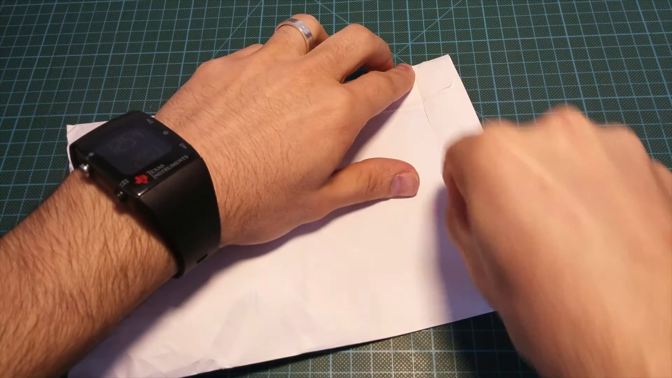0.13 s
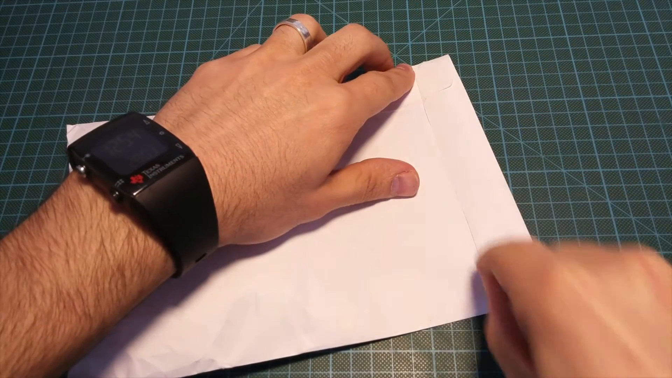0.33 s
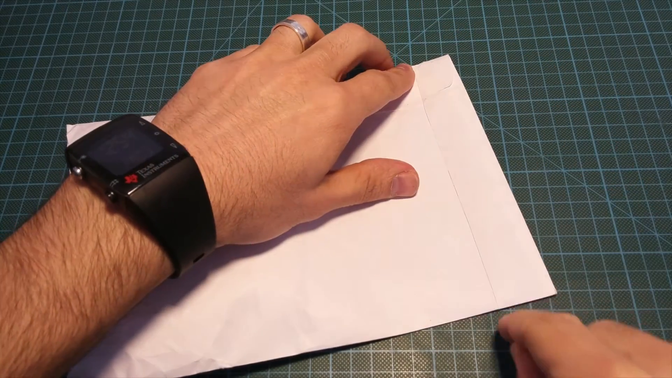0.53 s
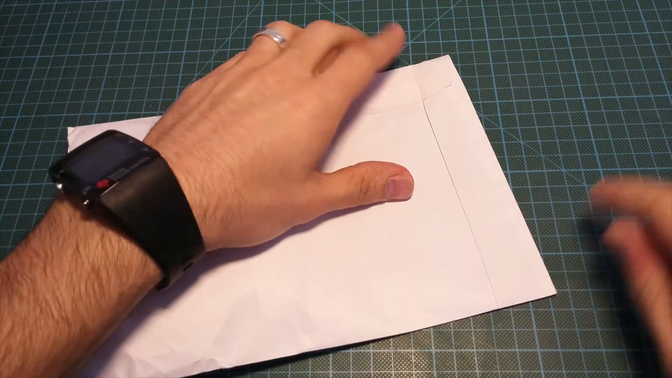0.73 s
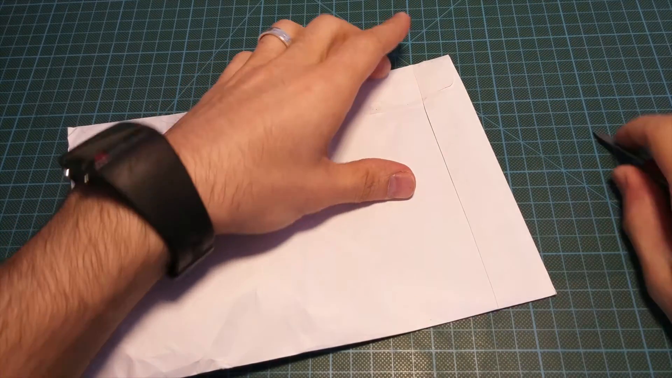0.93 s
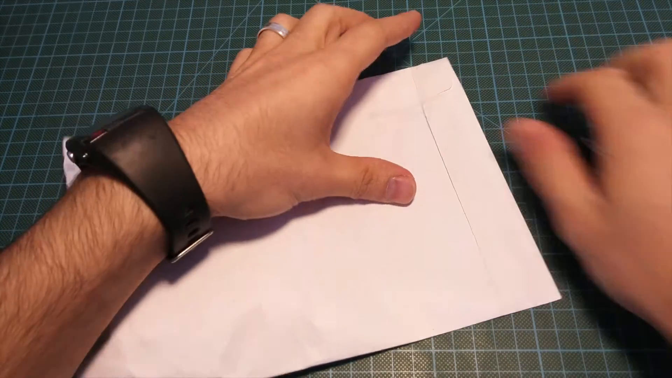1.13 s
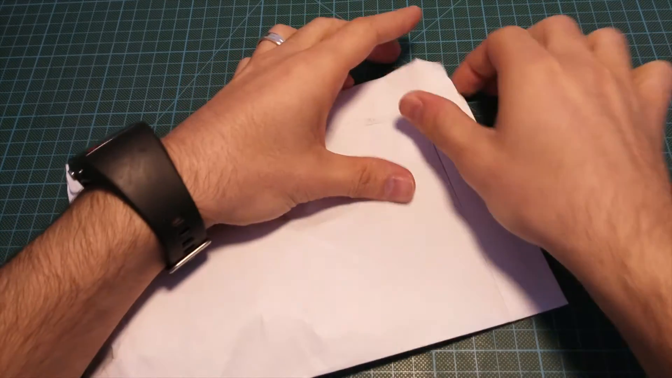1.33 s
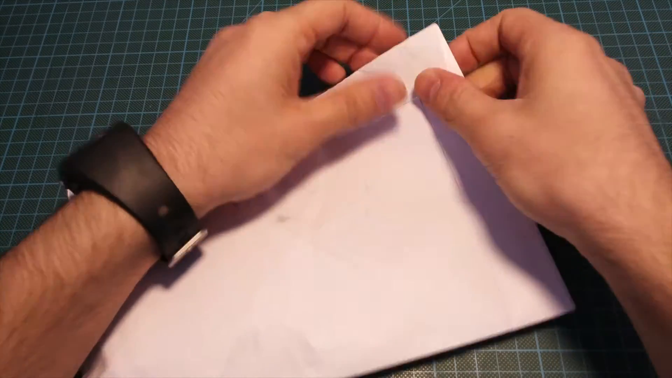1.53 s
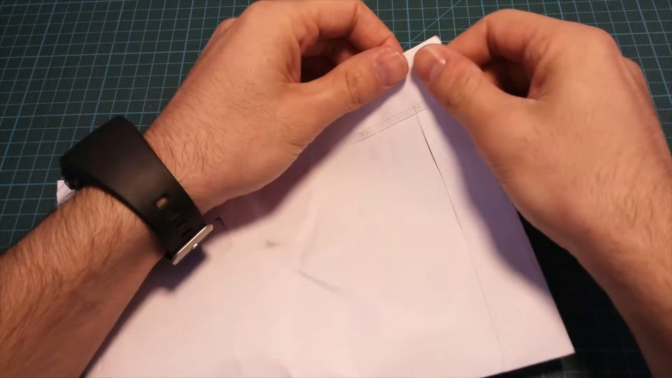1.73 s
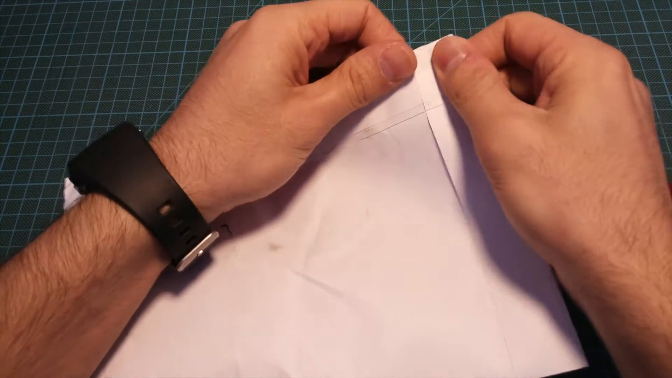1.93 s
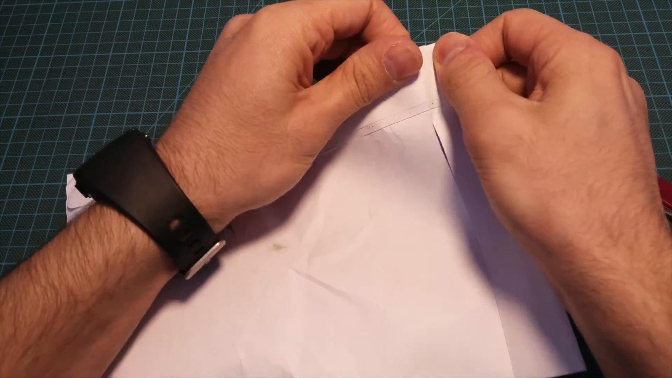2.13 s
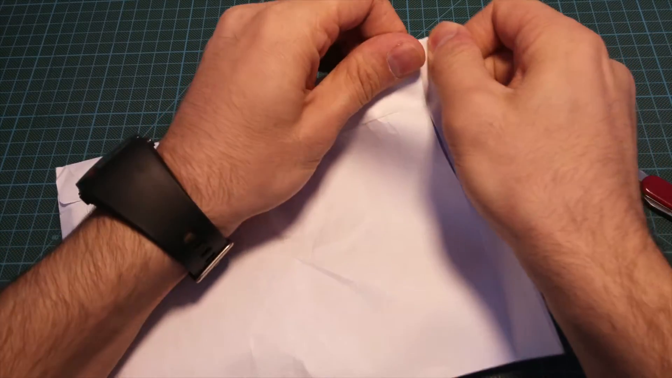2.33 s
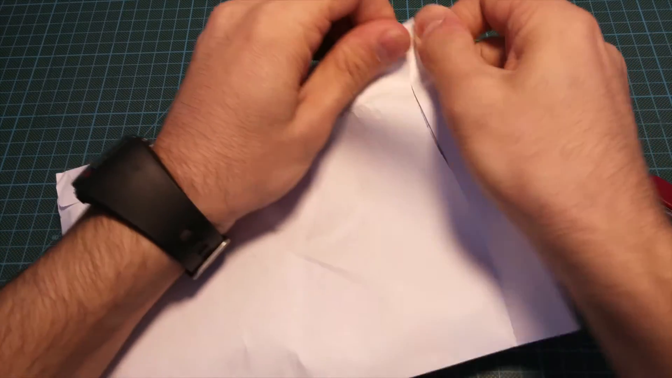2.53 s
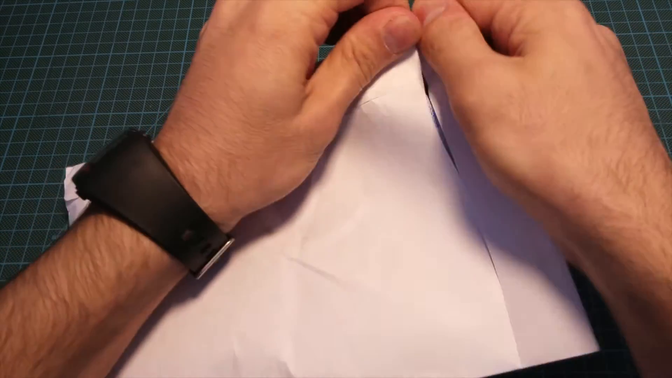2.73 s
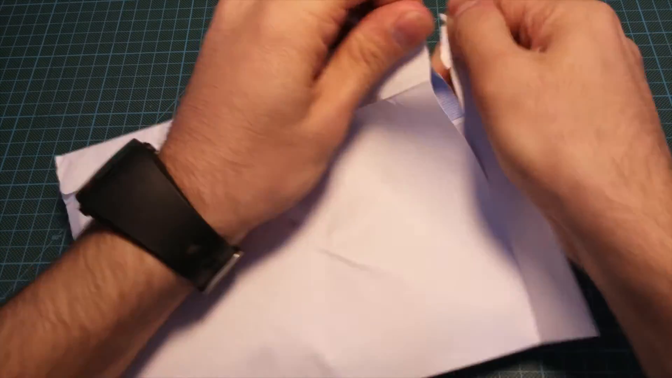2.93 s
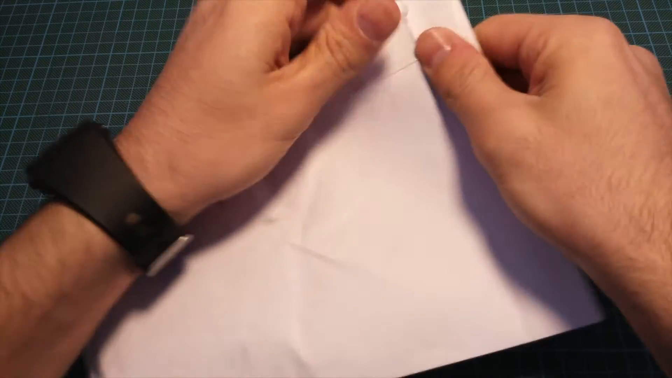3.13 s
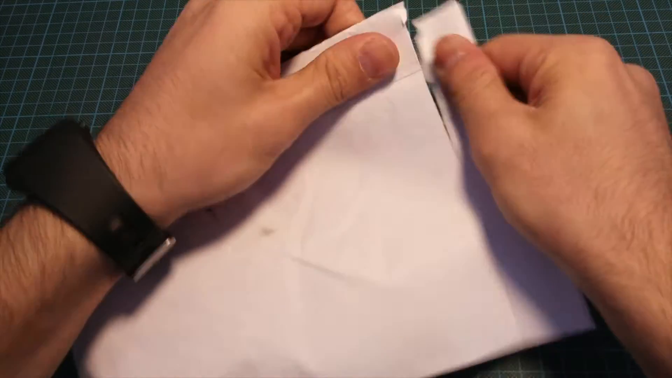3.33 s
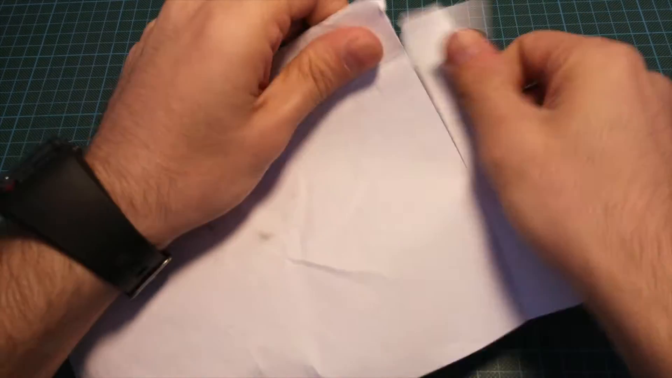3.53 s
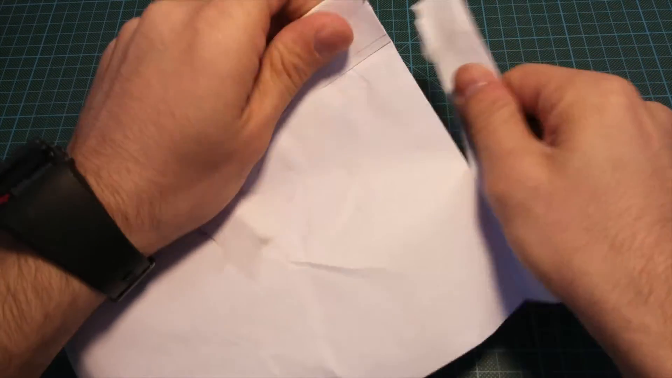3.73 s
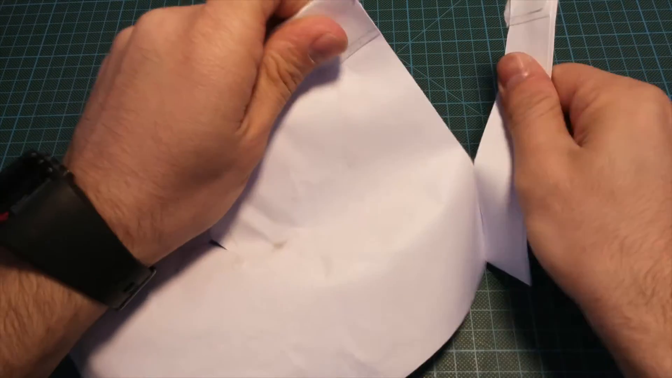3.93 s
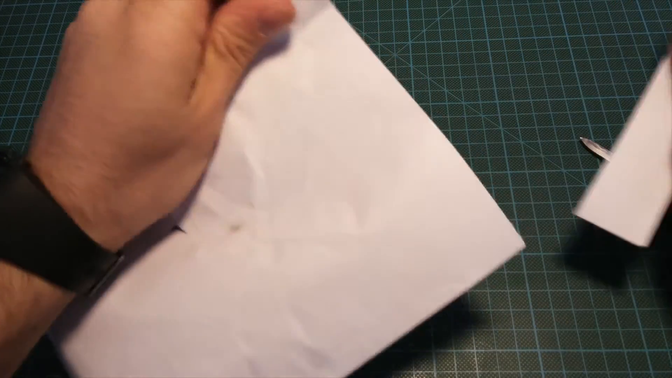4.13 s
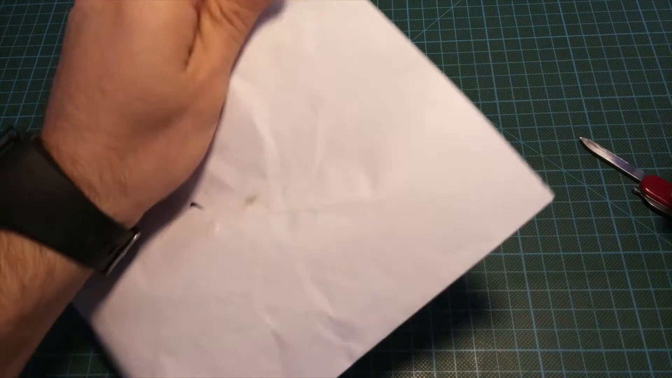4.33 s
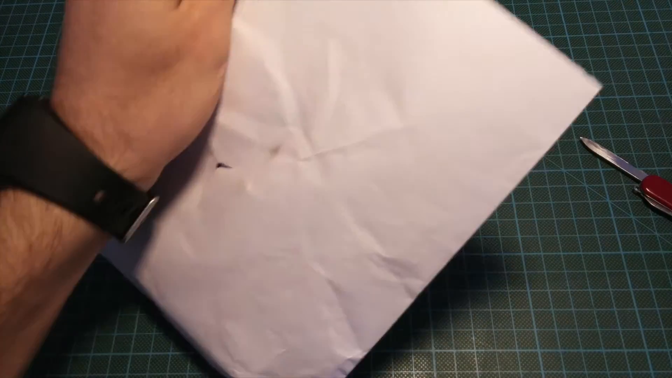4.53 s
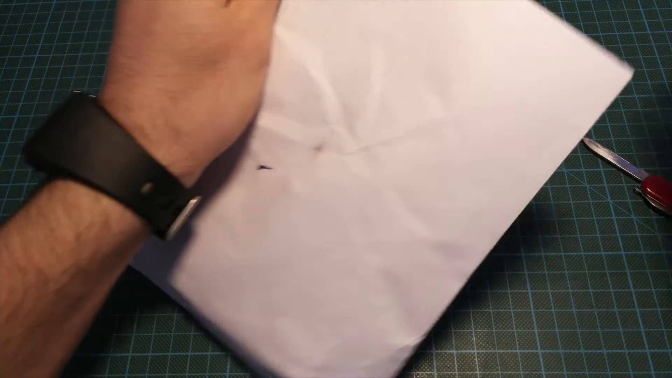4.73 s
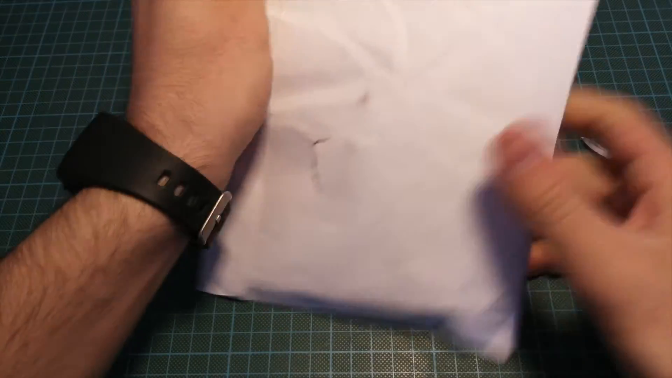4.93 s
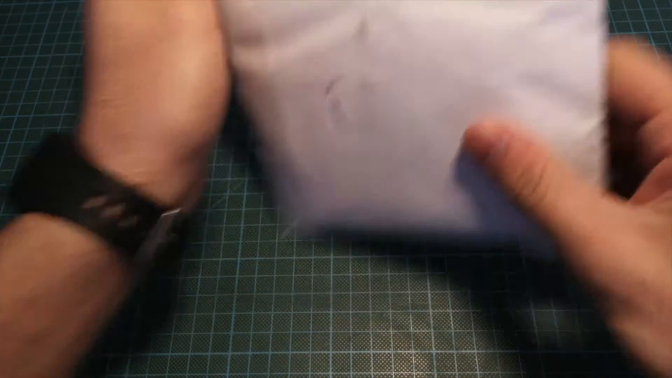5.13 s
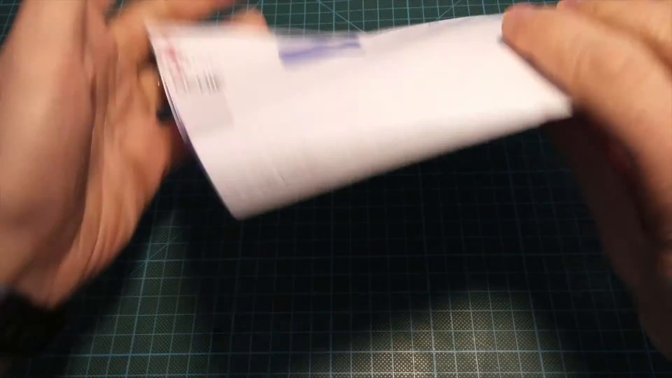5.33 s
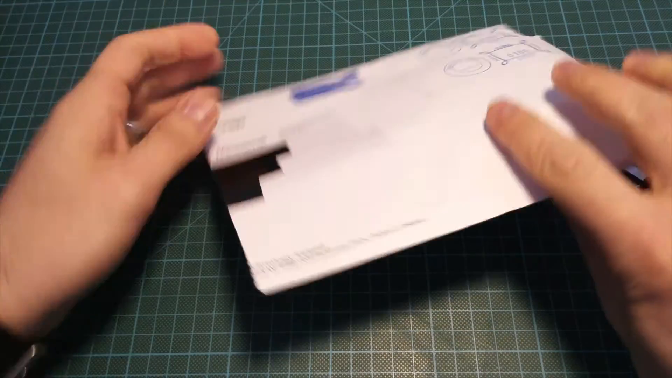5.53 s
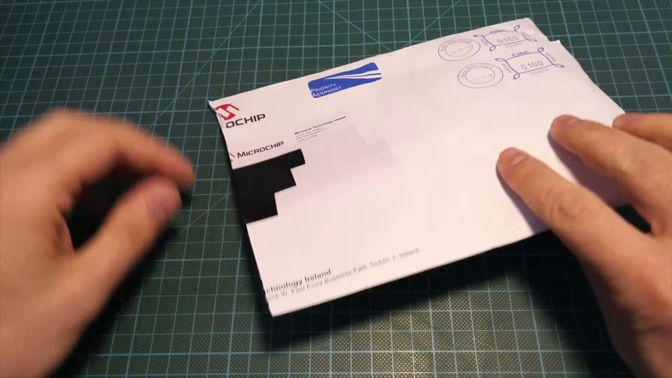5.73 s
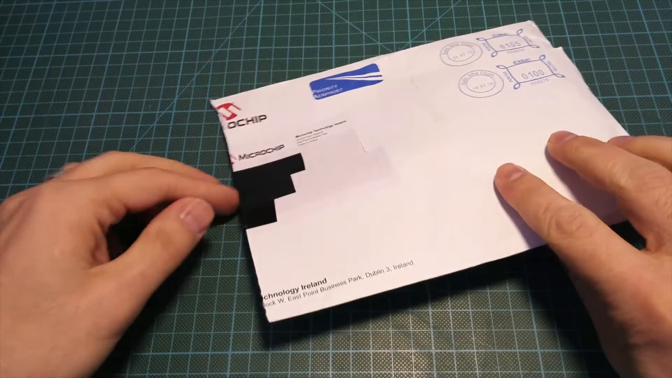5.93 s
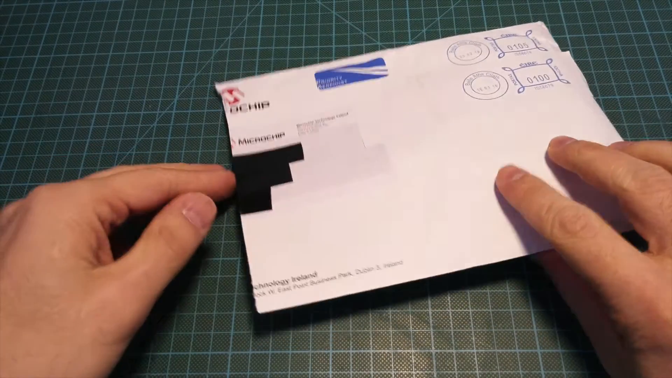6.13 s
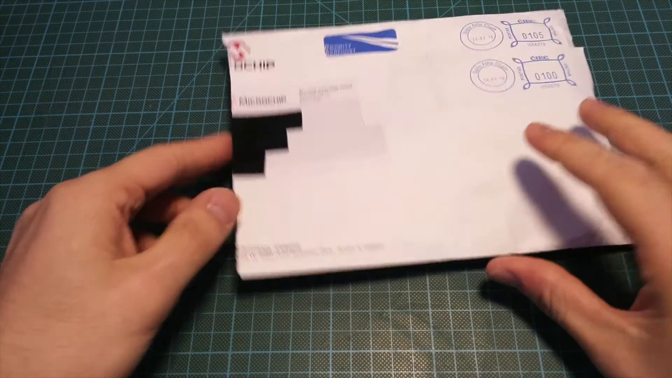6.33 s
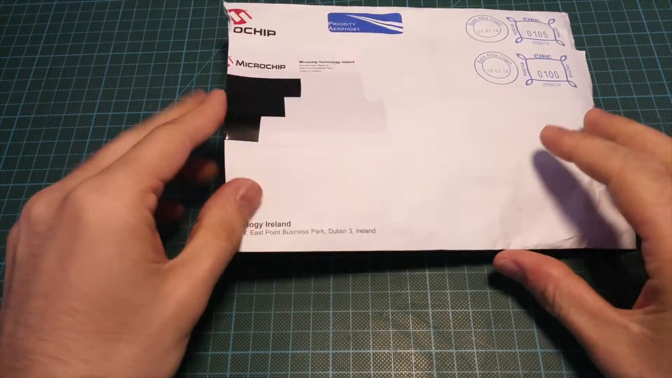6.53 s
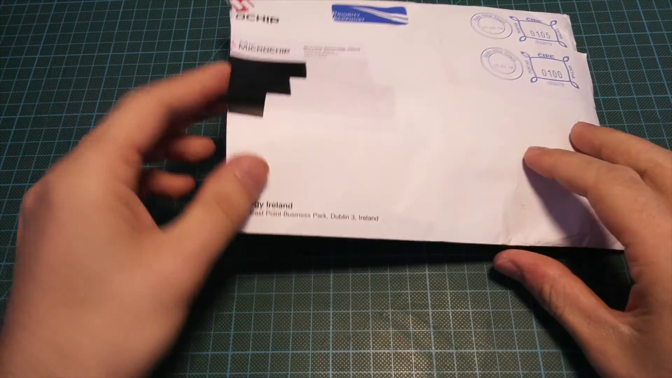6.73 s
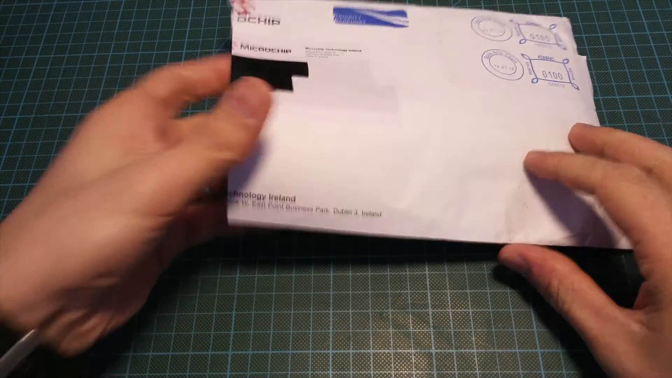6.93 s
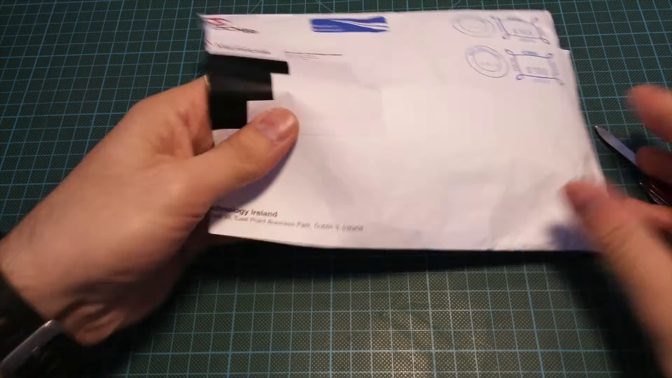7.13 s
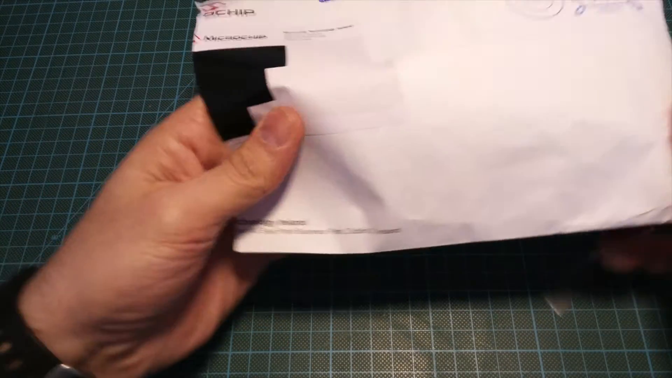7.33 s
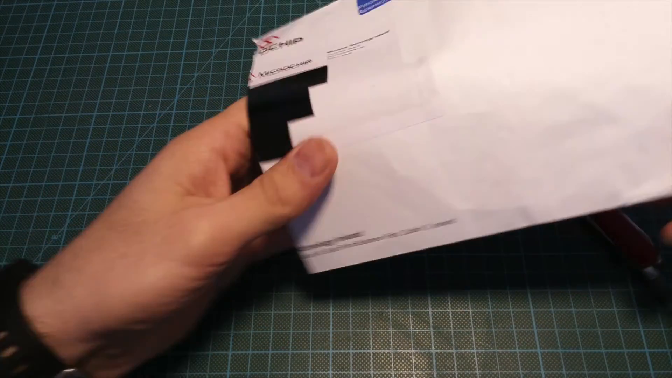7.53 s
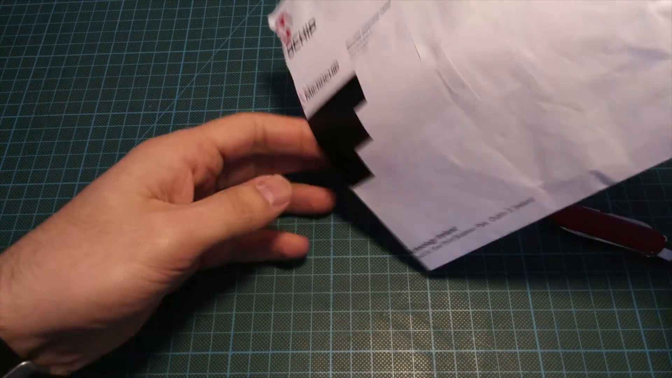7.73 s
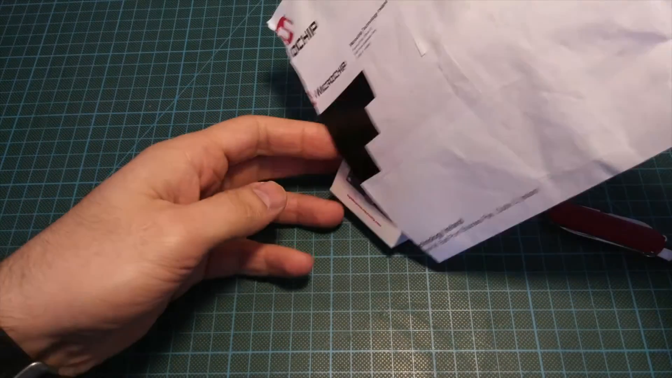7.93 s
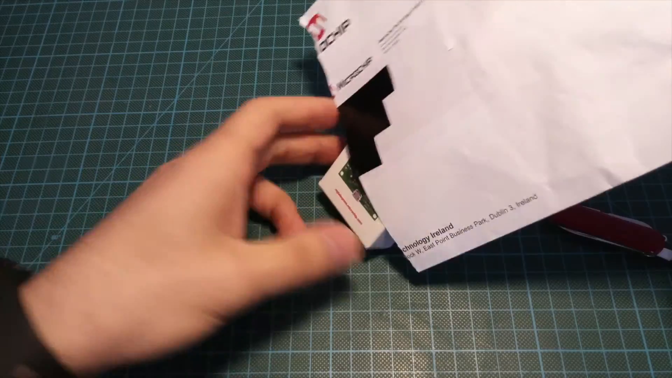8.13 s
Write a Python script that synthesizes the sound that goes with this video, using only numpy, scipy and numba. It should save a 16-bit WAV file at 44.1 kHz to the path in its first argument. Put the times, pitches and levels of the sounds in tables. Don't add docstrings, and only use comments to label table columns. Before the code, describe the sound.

Close, dry paper handling: a brief slide, picking snaps, sharp tears, soft swishes, then loud crinkling and low desk knocks in a small room.

```python
import sys
import numpy as np
from scipy import signal
from scipy.fft import rfft, irfft
from scipy.io import wavfile
from scipy.ndimage import uniform_filter1d, map_coordinates
from numba import njit

SR = 44100
rng = np.random.default_rng(int(sys.argv[2]) if len(sys.argv) > 2 else 0)


def linear_from_db(decibels):
    return 10 ** (np.asarray(decibels, float) / 20)


def master(y):
    cut = np.clip(np.atleast_2d(y).T, -1, 1)
    pcm = np.round(cut * 32767)
    wavfile.write(sys.argv[1], SR, pcm.astype(np.int16))


N = 361619

# pitch_hz, level_db (per Hz)
AIR = [(24, -33), (40, 42), (54, 2), (237, 13.5), (455, 0.5), (1720, 3), (6020, -24), (11000, -28),
       (16000, -24)]
AIR_DB = -62
# pitch_hz, gain_db
MIC = [(30, -21), (70, -17.5), (120, -6.5), (200, -5), (1000, 0.64), (3000, 0.96), (7000, 2), (12000, -2.5),
       (15800, 2), (16300, -25)]
# pitch_hz, left_minus_right_db
PORTS = [(250, -1.9), (1000, -1.1), (2500, 1.9), (8000, 2.9), (13000, -1.4)]
PORT_LAG_S = 0.000096
# pitch_hz, gain_db
WALLS = [(60, -3.5), (300, 3.5), (1200, -0.3), (4000, 3.5), (16000, -4.5)]
ROOM_T60_S, ROOM_DB = 0.34, -10.5
DESK_HZ, DESK_T60_S, DESK_DB = 127.9, 0.89, -64.5

# start_s, stop_s, level_db, stretch_ratio (of the resonances), glide_share
SWISHES = [
    (-.05, 0.453, -47.5, 1.23, 0),
    (4.283, 4.89, -62, 0.77, 0),
    (4.81, 5.175, -51, 0.9, .1),
    (5.18, 5.377, -49, .8, -.15),
    (5.585, 5.8, -45, 0.85, -.12),
    (6.05, 6.094, -55, 0.82, 0),
    (6.298, 6.41, -54, 0.96, .1),
    (6.4, 6.52, -54, 0.96, -.1),
]
# pitch_hz, width_hz, level_db
GAP = [(850, 350, 0), (1200, 200, 3), (1650, 170, 1), (2350, 200, -2), (3000, 800, -2), (5000, 700, -12),
       (3000, 7000, -11), (12500, 9000, -25)]
# start_s, stop_s, level_db, pitch_hz, half_width_hz
WHISPERS = [(4.26, 4.7, -65, 2330, 70), (4.4, 4.66, -66, 2950, 60), (4.68, 4.84, -63, 2900, 60),
            (4.78, 4.93, -57, 1800, 80), (1.84, 1.93, -56, 1700, 500), (4.75, 4.93, -61, 2300, 70),
            (5.615, 5.67, -52, 5000, 500), (5.62, 5.71, -44, 3000, 550), (5.61, 5.7, -42, 1150, 300),
            (5.59, 5.72, -48, 1680, 100), (5.2, 5.26, -50, 4600, 500), (5.22, 5.34, -49, 3250, 450),
            (5.27, 5.33, -53, 5600, 700), (7.52, 7.6, -46, 1600, 250), (7.1, 7.14, -48, 3300, 500),
            (7.19, 7.26, -50, 6000, 1500), (7.66, 7.69, -48, 4600, 600), (7.77, 7.83, -50, 4300, 600)]
# start_s, peak_db
BUMPS = [
    (4.202, -27),
    (5.101, -40),
    (5.199, -35),
    (7.6, -46),
    (7.91, -26),
    (7.96, -27),
    (8.02, -35),
]
BUMP_HZ, BUMP_CYCLES = 129, 4

# time_s, flexing_db, desk_weight_db, layer_shear_db
HANDS = [(0.0, -51.5, 2, 4), (0.2, -44.5, -3.5, -0.5), (0.77, -65.5, 0, -2.5), (1.3, -49.5, -15.5, -10),
         (1.57, -44.5, -12.5, -9.5), (2.12, -58.5, -12, -10), (3.04, -49.5, -13.5, -5.5),
         (3.9, -42, -12.5, -10), (4.32, -47, -14, -11), (4.59, -64.5, -7, 2), (5.07, -45.5, -13, -5),
         (5.43, -64, 2.5, 6), (5.57, -50, -8, -13.5), (5.98, -60, -8.5, -9), (6.92, -57.5, -5, -10.5),
         (6.99, -50, -17, -5.5), (7.79, -39.5, -11, -12.5), (8.2, -50, 1.5, -12)]
STIR_DB, STIR_S = -29.5, 0.039
# start_s, stop_s, swell_db, force_db, fineness_db
RIPS = [
    (1.113, 1.136, -9.5, -34.5, -11.5),
    (2.889, 2.95, 1.5, -28, -8),
    (3.432, 3.492, 1.5, -25.5, -18),
    (3.864, 3.878, -2.5, -21.5, -25.5),
    (4.116, 4.203, -4, -22.5, -12),
]
RIP_DESK_DB, RIP_RUB_DB = -12, -5.5
# start_s, stop_s, swell_db, force_db, fineness_db
SCUFFS = [(1.74, 1.8, 3, -50.5, -3), (2.597, 2.718, 6, -42, -14), (2.423, 2.495, -3, -62, -1.5),
          (6.967, 7.039, 8, -32.5, -17.5), (7.172, 7.261, -3, -43.5, -16), (7.5, 7.55, -14, -37, -18),
          (7.838, 7.905, 3.5, -36.5, -14), (3.89, 3.95, -3, -36, -10), (.6, .66, 0, -58, -4),
          (5.41, 5.5, -3, -50, -14), (4.125, 4.2, -5, -28.5, -11), (5.18, 5.21, 8, -42, -14),
          (5.06, 5.09, 3, -44, -14), (3.1, 3.135, 3, -46, -4)]
SCUFF_RUB_DB = -8
# low_hz, high_hz, share_of_ticks (that ring here), length_cycles, size_spread_db, trim_db
SWARMS = [
    (450, 2320, 0.4, 2.54, 6, -2.5),
    (81, 423, 0.14, 1, 1, 3.5),
    (2310, 6240, 0.89, 2.9, -6.5, -0.2),
    (7900, 14600, 1, 2.8, 3.5, 4),
]
FIBRE_UNDER_RUB_DB = -9

# start_s, peak_db, pitch_hz
POPS = [(2.2344, -11, 1200), (2.2015, -24, 2600), (2.347, -22, 1200), (3.8715, -8, 1500),
        (4.1238, -6, 1500), (3.4965, -14, 1300), (5.2065, -20, 1100), (7.6225, -22, 850), (7.637, -21, 950),
        (7.5025, -26, 4400), (7.504, -28, 5400), (1.961, -28, 4800), (4.158, -11, 450), (4.136, -14, 900),
        (4.178, -15, 2500), (4.2, -15, 1800), (3.878, -16, 1500), (3.892, -19, 1800), (3.444, -17, 1300),
        (3.462, -12, 1100), (3.473, -14, 1500), (3.966, -24, 1000), (4.085, -32, 900), (7.203, -24, 950),
        (7.224, -23, 1100), (7.261, -24, 900), (7.279, -28, 1000), (7.4, -29, 800), (7.495, -30, 700),
        (7.512, -25, 700), (7.521, -28, 900), (7.552, -30, 1200), (7.673, -26, 900), (7.722, -30, 1400),
        (7.773, -31, 690), (7.105, -30, 1100), (7.12, -30, 1000), (2.122, -40, 800), (2.405, -44, 1200),
        (2.428, -40, 3600), (2.455, -46, 4600), (3.148, -36, 1300), (3.234, -36, 1500), (2.905, -20, 1200),
        (2.92, -22, 1300), (4.905, -42, 900), (5.198, -32, 1000), (5.068, -36, 1000), (.9655, -27, 2400),
        (1.124, -11, 1500), (1.157, -20, 1600), (2.956, -6, 1350), (.776, -36, 2000), (1.419, -21, 2300),
        (1.565, -15, 2600), (3.457, -14, 2200), (1.945, -38, 500), (1.455, -30, 1100), (1.668, -32, 600),
        (7.392, -32, 2400)]
# start_s, peak_db
CRACKS = [(.613, -35), (0.647, -29), (1.1105, -16), (1.201, -29), (1.209, -26.5), (1.3656, -32.5),
          (1.564, -25), (1.7486, -38), (1.769, -28.5), (2.128, -34.5), (2.263, -27), (2.283, -29),
          (2.645, -27), (2.6796, -34), (2.8435, -34.5), (2.8907, -21.5), (3.1072, -29.5), (3.4239, -18.5),
          (3.4537, -14), (3.5626, -30.5), (3.6334, -30.5), (3.8103, -27), (3.8712, -16.5), (3.885, -18),
          (3.929, -21), (3.9425, -17), (4.0976, -18), (4.123, -14), (4.1706, -15.5), (7.86, -38),
          (2.3146, -43), (2.3336, -42), (2.4274, -42), (2.473, -46), (2.4982, -42), (2.5985, -39),
          (2.8654, -37), (3.122, -34), (3.2046, -36), (3.233, -41), (3.3428, -42), (3.3742, -37),
          (3.435, -22), (3.473, -22), (3.7404, -38), (3.974, -32), (4.107, -31), (4.117, -25), (4.134, -20),
          (4.148, -20), (4.158, -20), (4.19, -22), (5.415, -42), (5.956, -50), (6.065, -56), (.754, -48),
          (6.37, -56), (6.455, -54), (1.961, -34)]
# start_s, peak_db, pitch_hz
CRINKLES = [(.649, -34.5, 3440), (1.123, -14, 1400), (1.44, -26.5, 1080), (1.677, -27, 427),
            (2.553, -40, 410), (2.597, -51, 1090), (2.845, -35.5, 700), (2.945, -11, 1400),
            (3.024, -32, 1150), (3.368, -35, 1100), (3.472, -29, 795), (3.559, -18.5, 1050),
            (4.033, -37, 880), (4.161, -18.5, 1110), (7.081, -21.5, 950), (7.185, -24.5, 970),
            (7.234, -18.5, 885), (7.271, -23, 1040), (7.314, -29, 600), (7.418, -33, 1010),
            (7.536, -30, 525), (7.572, -35, 1440), (7.591, -32.5, 1050), (7.654, -28, 1030),
            (7.829, -27, 1530), (7.953, -36, 1050), (8.1, -27, 770), (8.119, -27, 1350),
            (8.147, -35.5, 824), (8.186, -47, 403)]
# start_s, peak_db, pitch_hz,
# edge_db (against the peak)
PICKING = [(.445, -37, 840, -12), (0.613, -40, 450, 2), (0.775, -35, 2020, -10), (0.965, -34, 2000, -20),
           (1.093, -37, 1100, -48), (1.111, -10.5, 920, -43), (1.157, -20, 1500, -20),
           (1.322, -20, 1190, -12), (1.367, -29.5, 450, -3), (1.418, -19, 2030, -1),
           (1.474, -26.5, 1080, -9), (1.544, -23.5, 2000, -7), (1.562, -10.5, 1480, -3.5),
           (1.591, -22.5, 1430, -37), (1.63, -20.5, 1400, -31), (1.96, -14.5, 930, -8.5),
           (1.987, -18, 1350, -26), (2.153, -30.5, 1120, -11), (2.2, -32, 800, 1), (2.2345, -24, 1130, -6),
           (2.346, -22, 1050, -37), (2.497, -43, 2240, -2), (2.519, -24, 1200, -7),
           (2.642, -31, 2000, -7.5), (2.68, -26.5, 990, -24), (2.794, -35.5, 860, -33)]
# start_s, peak_db, pitch_hz, edge_db
TEARING = [(2.891, -27, 1780, -23), (2.932, -17.5, 1020, -5), (2.955, -2, 1430, -12.5),
           (3.06, -20, 990, -27), (3.205, -24.5, 1770, -16), (3.398, -30.5, 1000, -2.5),
           (3.421, -22.5, 990, -9), (3.435, -9.5, 1020, -18), (3.455, -4.5, 1150, -10),
           (3.493, -18.5, 1140, 0), (3.542, -26, 980, -15), (3.638, -26, 1400, -29),
           (3.81, -24, 1270, -5.5), (3.825, -21, 1130, -5), (3.872, -13, 1350, -15),
           (3.883, -5.5, 1120, -5.5), (3.928, -35, 1020, 4), (3.941, -19, 850, -0.5),
           (4.097, -19, 700, 0.5), (4.121, -12, 940, -33), (4.147, -10, 1130, -12), (4.191, -11, 970, -4),
           (4.234, -16.5, 950, -20)]
# start_s, peak_db, pitch_hz, edge_db
TURNING = [(4.544, -47, 700, -12), (4.574, -41, 666, -10), (4.83, -44.5, 920, -8), (4.93, -23, 2000, -15),
           (5.043, -28, 710, -12), (5.076, -30, 800, -1.5), (5.132, -29, 714, -21), (5.204, -26, 720, -5),
           (5.334, -45.5, 670, -3), (5.397, -44.5, 1080, -1), (5.414, -27, 1110, -5.5),
           (5.435, -33, 790, -4), (5.482, -33, 750, -3.5), (5.522, -44, 921, -19), (5.559, -39, 774, -30),
           (5.705, -32, 1040, -6), (5.722, -38.5, 826, -19), (5.955, -39, 1060, -3), (6.178, -50, 790, -12),
           (6.36, -43.5, 780, -6), (6.688, -29, 1140, -21), (6.692, -24.5, 950, -4),
           (6.843, -44.5, 1000, -9)]
# start_s, peak_db, pitch_hz, edge_db
SHAKING = [(6.995, -30, 910, -3), (7.012, -14, 1030, -8.5), (7.059, -23.5, 960, -4),
           (7.074, -13, 1040, -3.5), (7.166, -24.5, 880, -28), (7.194, -16, 1030, -32),
           (7.216, -17, 980, -25), (7.253, -21.5, 770, -14), (7.307, -23, 930, -32),
           (7.346, -12.5, 920, -12.5), (7.385, -30.5, 760, -3), (7.456, -32.5, 740, -27),
           (7.501, -26, 633, -3), (7.622, -26, 730, -17), (7.636, -22, 900, -38), (7.665, -20, 1000, -14),
           (7.713, -27, 1010, -13), (7.804, -30.5, 855, -0.5), (7.838, -19.5, 1450, -15),
           (7.902, -5, 850, -12.5), (7.996, -19.5, 1720, -15), (8.007, -21, 870, -15),
           (8.093, -29, 1500, 3)]
CRACK_UNDER_EDGE_DB = [
    -12,
    -15,
    -25,
    -8,
]
SETTLE_DB, SETTLE_PER_DB, CRINKLE_EDGE_DB = -12.5, -0.34, -15.5


def level(x, db):
    return x * linear_from_db(db) / np.sqrt(np.mean(x ** 2))


def colour(x, points):
    hz, db = np.transpose(points)
    log_hz = np.log(np.fft.rfftfreq(4096, 1 / SR) + 1)
    log_gain = np.interp(log_hz, np.log(hz), db) * np.log(10) / 20
    cepstrum = irfft(log_gain)
    cepstrum[1:2048] *= 2
    cepstrum[2049:] = 0
    response = irfft(np.exp(rfft(cepstrum)))[None, :2048]
    return signal.fftconvolve(x, response, axes=1)[:, :N]


def band(x, lo_hz, hi_hz):
    sos = signal.butter(3, [lo_hz, min(hi_hz, .45 * SR)], "band", fs=SR, output="sos")
    return signal.sosfilt(sos, x)


def widen(mid, side, width):
    return mid + width * side * np.array([[1], [-1]])


def chances(count, kinds):
    return np.clip(rng.standard_normal((count, kinds)).T, -2, 2)


@njit
def rings(at, hz, cycles, size, turn):
    out = np.zeros((2, N))
    for c in range(2):
        for k in range(len(hz)):
            tau = cycles[k] * SR / hz[k] / 4
            first = int(at[c, k]) + 1
            p = np.exp(2j * np.pi * hz[k] / SR - 1 / tau)
            late = first - at[c, k]
            z = size[c, k] * np.exp(1 + 1j * turn[k] + late * np.log(p)) / tau
            for i in range(max(first, 0), min(first + int(9 * tau) + 2, N)):
                out[c, i] += (i - at[c, k]) * z.imag
                z *= p
    return out


def heard(s, hz, cycles, db, pan_db, chance):
    side = np.array([[.5], [-.5]])
    at = (s + side * PORT_LAG_S * chance[0]) * SR
    size = linear_from_db(db + side * pan_db)
    return rings(at, np.clip(hz, 40, .4 * SR), cycles + 0 * s, size, np.pi * chance[1])


def shower(s, length_s, db, hz, scatter, cycles, fade_db, tilt_db, count):
    wait = rng.random((len(s), count)).T ** 1.529
    chance = np.clip(rng.standard_normal((len(s), 4, count)).T, -2, 2)
    out = 0
    for w, c in zip(wait, chance):
        pitch_hz = hz * np.exp(scatter * c[2])
        tone_db = db - fade_db * w - tilt_db * c[2]
        out = out + heard(s + length_s * w, pitch_hz, cycles, tone_db, 2.0 * c[3], c)
    return out


def air():
    mid, side = rng.standard_normal((2, N))
    return level(colour(widen(mid, side, 0.83), AIR), AIR_DB)


def room(x):
    t = np.arange(SR) / SR
    mid, side = rng.standard_normal((2, SR))
    tail = widen(mid, side, 0.61) * 1000. ** (-t / ROOM_T60_S)
    tail = tail * np.clip(t / 0.0031 - 1, 0, 1)
    tail = linear_from_db(ROOM_DB) * colour(tail / np.sqrt(np.sum(tail ** 2) / 2), WALLS)
    desk = linear_from_db(DESK_DB) * np.sin(2 * np.pi * DESK_HZ * t) * 1000. ** (-t / DESK_T60_S)
    tail[:, :SR] += desk
    return signal.fftconvolve(x.mean(axis=0)[None], tail, axes=1)[:, :N]


def bumps():
    s, db = np.transpose(BUMPS)
    chance = chances(len(s), 3)
    return heard(s, BUMP_HZ * np.exp(0.2 * chance[2]), BUMP_CYCLES, db, 0, chance)


def slide(start, stop):
    progress = np.clip((np.arange(N) / SR - start) / (stop - start), 0, 1)
    return np.sin(np.pi * progress ** 0.62)


def swishes(patchy_db=5.0, grain_db=3.0):
    out = 0
    knots = np.arange(0, N, 1300)
    for start, stop, db, stretch, glide in SWISHES:
        mid, side, grain = rng.standard_normal((3, N))
        noise = widen(mid, side, 0.7)
        tone = 0
        for hz, width, gain_db in GAP:
            peak = signal.iirpeak(hz * stretch, hz / width, SR)
            walk = np.interp(np.arange(N), knots, rng.standard_normal(len(knots)))
            ringing = signal.lfilter(*peak, signal.lfilter(*peak, noise))
            tone = tone + linear_from_db(gain_db + patchy_db * np.clip(walk, -1, 1)) * ringing
        k = np.arange(max(int(start * SR), 0), int(stop * SR))
        place = k[0] + np.cumsum(1 + glide * np.linspace(-1, 1, len(k)))
        tone = level(tone, db)
        tone[:, k] = [map_coordinates(c, [place]) for c in tone]
        roughness = linear_from_db(grain_db * level(uniform_filter1d(grain, 150), 0))
        out = out + tone * roughness * slide(start, stop)
    return out


def whispers():
    out = 0
    for start, stop, db, hz, half_hz in WHISPERS:
        noise = rng.standard_normal((2, N)) + rng.standard_normal(N)
        hiss = level(band(noise, hz - half_hz, hz + half_hz), db)
        out = out + hiss * slide(start, stop) ** .7
    return out


def effort(t):
    s, db, weight_db, shear_db = np.transpose(HANDS)
    power = linear_from_db(2 * np.interp(t, s, db))
    for at, peak_db, *_ in PICKING + TEARING + TURNING + SHAKING:
        k = slice(*np.searchsorted(t, [at, at + 6 * STIR_S]))
        power[k] += linear_from_db(2 * (peak_db + STIR_DB)) * np.exp((at - t[k]) / STIR_S)
    flex_db = 10 * np.log10(power)
    return flex_db, flex_db + np.interp(t, s, weight_db), flex_db + np.interp(t, s, shear_db)


def swarm(at, lo_hz, hi_hz, share_of_ticks, cycles, spread_db, share, clumps):
    total = at.shape[1]
    s, db = at[:, :int(np.clip(share_of_ticks, .05, 1) * total)]
    pitch_hz = lo_hz * (hi_hz / lo_hz) ** rng.random(len(s))
    chance = chances(len(s), 4)
    ticks = heard(s, pitch_hz, cycles, db + spread_db * chance[3], 2.6 * chance[2], chance)
    mid, side = band(rng.standard_normal((2, N)), lo_hz, hi_hz)
    hiss = widen(mid, side, np.clip(lo_hz / 690.0, .15, 1))
    return np.sqrt(share) * level(ticks * clumps, 0) + np.sqrt(1 - share) * level(hiss, 0)


def handling(clump_db=8.5, tick_db=2.5):
    t = np.arange(N) / SR
    flex_db, desk_db, rub_db = effort(t)
    gains = linear_from_db(np.array([flex_db, desk_db, rub_db, rub_db + FIBRE_UNDER_RUB_DB]))
    lifts = [(*row, RIP_RUB_DB) for row in RIPS] + [(*row, SCUFF_RUB_DB) for row in SCUFFS]
    for start, stop, swell_db, force_db, fine_db, shear_db in lifts:
        on = np.clip((t - start) / .002, 0, 1) * np.clip(1 - (t - stop) / .012, 0, 1)
        on = on * linear_from_db(swell_db * (np.clip((t - start) / (stop - start), 0, 1) - 1.0))
        lift = linear_from_db(force_db + np.array([0, RIP_DESK_DB, shear_db, fine_db]))
        gains = np.hypot(gains, lift[:, None] * on)
    tick_s = rng.random(12000) * N / SR
    at = np.array([tick_s, tick_db * np.clip(rng.standard_normal(12000), -2, 2.5)])
    steps = np.clip(rng.standard_normal(N // 500 + 1), -2, 2)
    clumps = linear_from_db(clump_db * uniform_filter1d(np.repeat(steps, 500), 200)[:N])
    sliding = np.clip(1.4 * sum(slide(*row[:2]) for row in SWISHES), 0, .8)
    share = np.clip(0.51 + (20 * np.log10(gains[0]) + 44.0) / 34, .1, .92) * (1 - sliding)
    out = 0
    for gain, (*row, trim_db) in zip(gains, SWARMS):
        out = out + gain * linear_from_db(trim_db) * swarm(at, *row, share, clumps)
    return out


def pops():
    s, db, hz = np.transpose(POPS)
    chance = chances(len(s), 3)
    return heard(s, hz, 2.2, db, 1.5 * chance[2], chance[:2] / [[2], [10]])


def cracks():
    events = CRACKS
    for rows, under_db in zip((PICKING, TEARING, TURNING, SHAKING), CRACK_UNDER_EDGE_DB):
        events = events + [(s, db + edge_db + under_db) for s, db, hz, edge_db in rows]
    s, db = np.transpose(events)
    return shower(s, .005, db - 3.5, 10230, 0.434, 4.9, 7.5, 0.17, count=16)


def snaps():
    small = [(*row, CRINKLE_EDGE_DB) for row in CRINKLES]
    s, db, hz, edge_db = np.transpose(PICKING + TEARING + TURNING + SHAKING + small)
    settle_db = SETTLE_DB + SETTLE_PER_DB * db
    t = np.arange(N) / SR
    thump_db = 0.53 * db + 0.56 * np.interp(s, t, effort(t)[1]) + 10.5
    chance = chances(len(s), 5)
    pop = heard(s + 0.00057, hz, 2.25, db - .3, 0, chance[:2] / [[2], [4]])
    thump = heard(s + 0.0021, 250 * np.exp(0.3 * chance[2]), 2.7, thump_db - .3, 0, chance[3:])
    settle = shower(s + 0.001521, .013, db + settle_db, 1.29 * hz, 0.37, 1.92, 10.3, 0.12, count=12)
    edge = shower(s + .0008, .007, db + edge_db - 6.5, 3500, .33, 4.0, 8, 3, count=20)
    return pop + thump + settle + edge


def scene():
    paper = handling() + snaps() + cracks() + bumps() + swishes() + whispers() + pops()
    return paper + room(paper) + air()


def top_cut(x):
    return signal.sosfilt(signal.butter(12, 17130, fs=SR, output="sos"), x)


def record(dry):
    left = colour(dry[[0]], [(hz, db / 2) for hz, db in PORTS])
    right = colour(dry[[1]], [(hz, -db / 2) for hz, db in PORTS])
    drift = level(band(rng.standard_normal((2, N)), 12, 50), -92) - .0006
    mix = np.clip(colour(np.vstack([left, right]), MIC) + drift, -1, 1)
    return top_cut(mix)


dry = scene()
out = record(dry)
master(out)
```